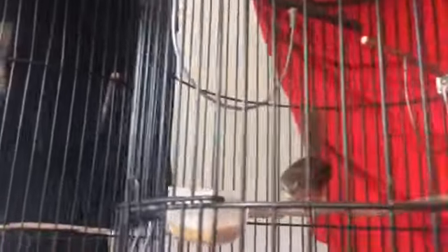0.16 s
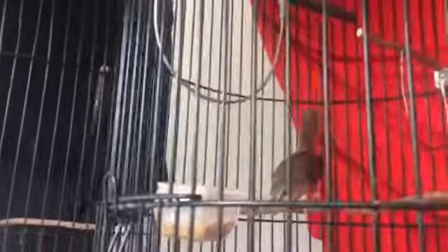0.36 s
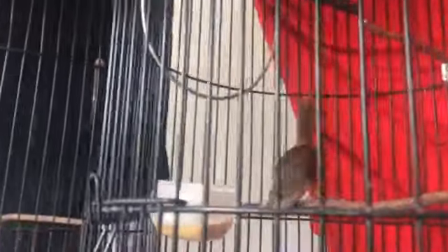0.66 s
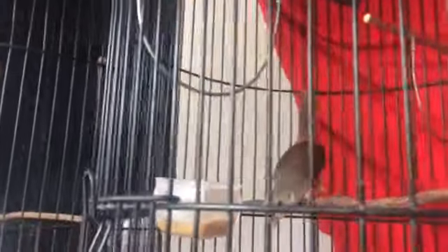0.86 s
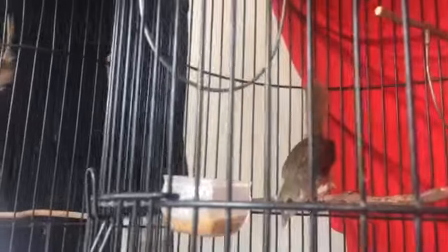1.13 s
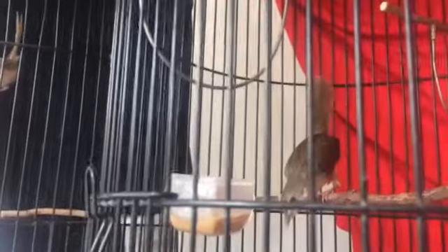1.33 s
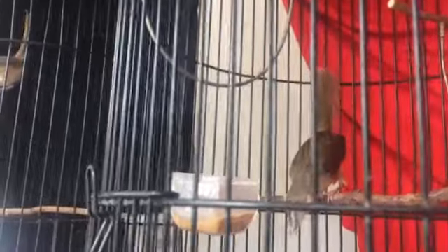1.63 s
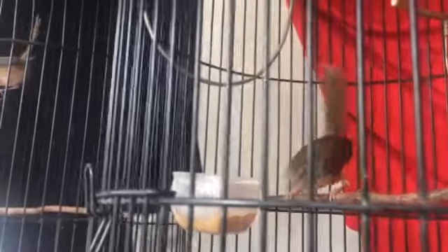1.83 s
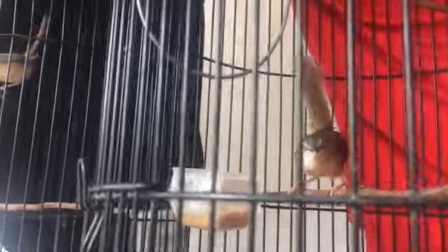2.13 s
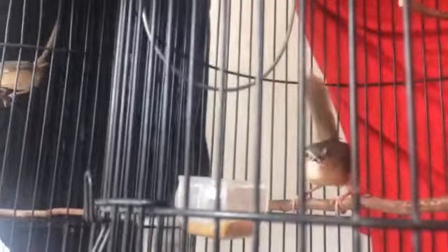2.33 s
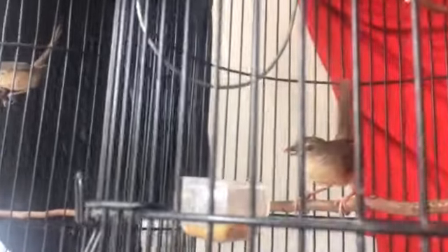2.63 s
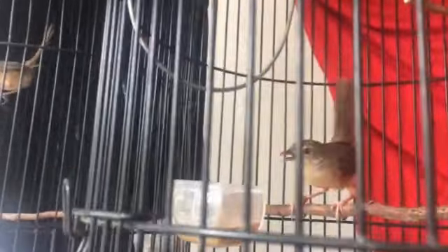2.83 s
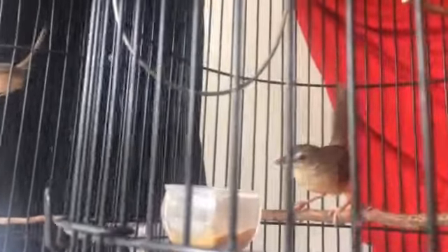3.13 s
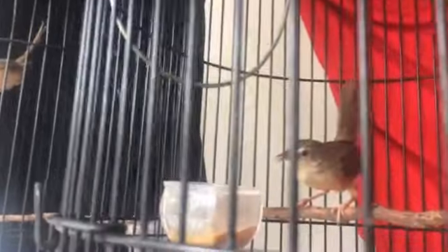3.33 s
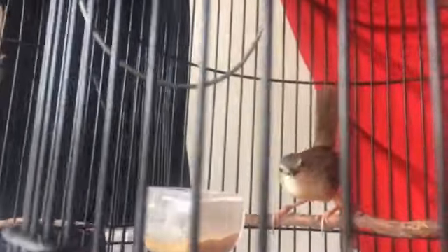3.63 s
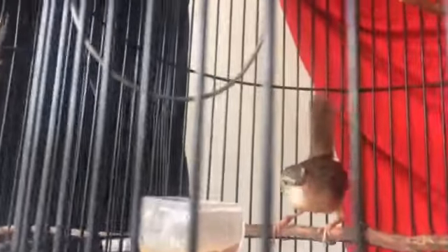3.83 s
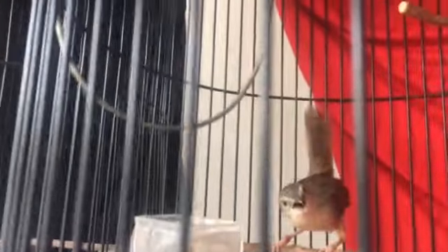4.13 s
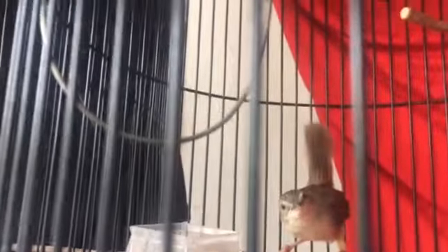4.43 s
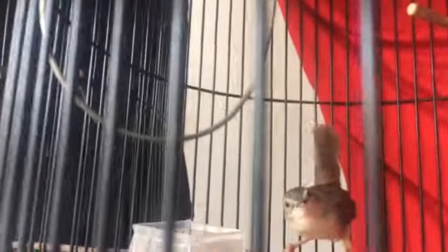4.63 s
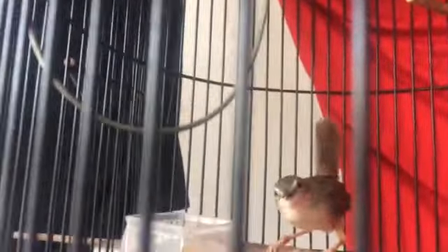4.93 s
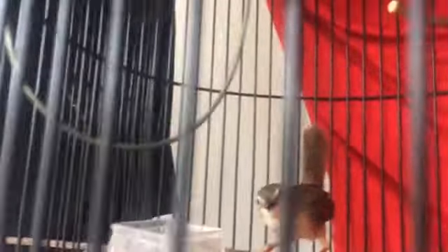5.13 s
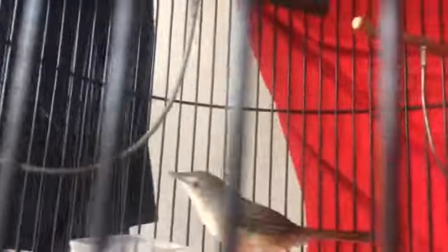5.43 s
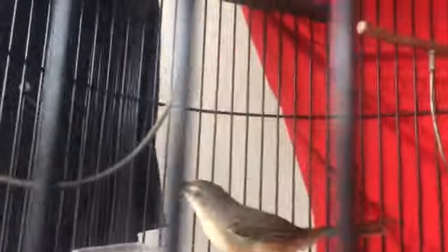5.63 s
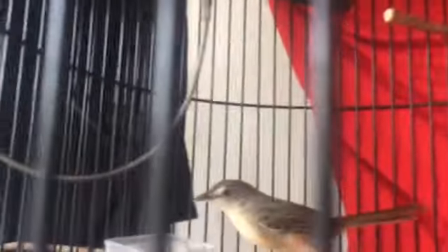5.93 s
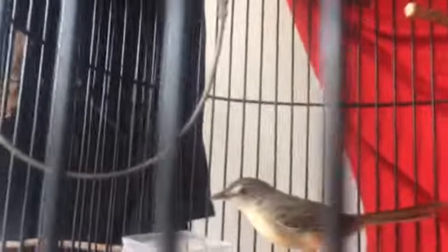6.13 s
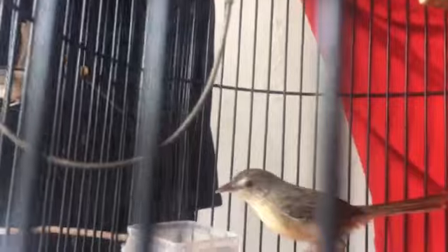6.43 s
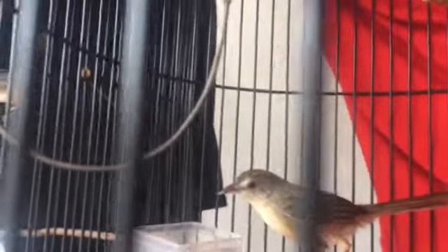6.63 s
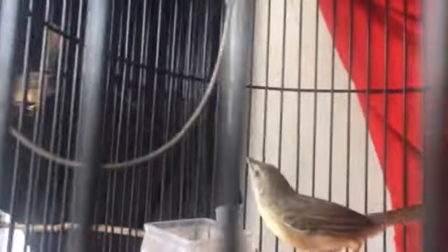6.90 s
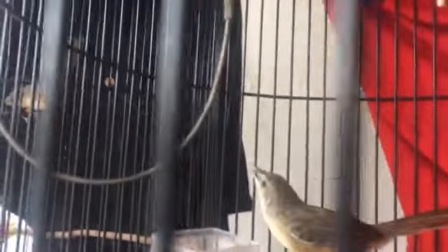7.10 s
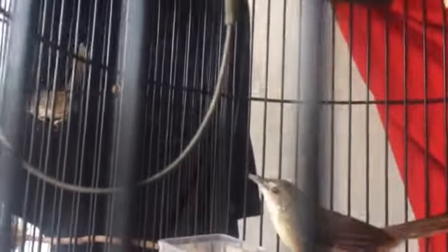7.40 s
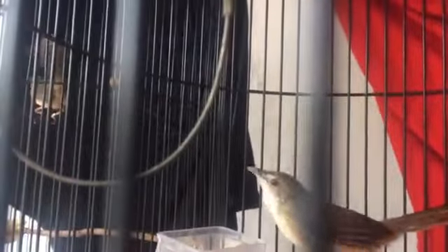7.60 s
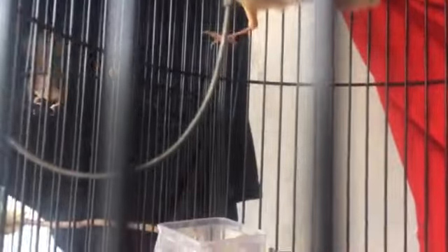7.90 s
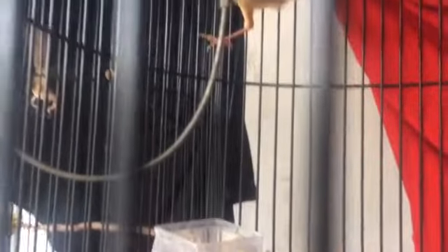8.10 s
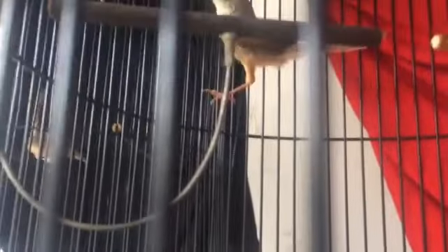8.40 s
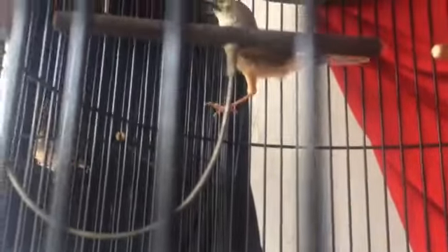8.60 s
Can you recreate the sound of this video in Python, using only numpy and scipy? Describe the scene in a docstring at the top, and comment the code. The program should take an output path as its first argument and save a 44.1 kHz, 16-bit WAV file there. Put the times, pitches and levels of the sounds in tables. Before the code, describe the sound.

Handheld close microphone indoors: a neighbouring caged songbird starts a regular ticking run of chirps, then the near bird joins with louder, thin whistled flicks, arches and rapid warbles, each under a tenth of a second or slightly longer. The neighbour pauses, then resumes steadily to the end. Faint hoarse and clear cockerel crows come from outside, with occasional dull bumps and a quiet hum. The near bird finishes with several piercing chips that briefly push the background down.

```python
"""A near caged warbler whistles loud zigzag sweeps indoors: a near-sine glides in pitch through a throat resonance.
A second warbler in the next cage repeats a down-up-down phrase by the same mechanism, with more room in it.
Far outside, cockerels crow as stacks of partials; a machine hums as wavering sines over shaped room noise.
Soft thuds are puffs of low noise, and a claw on the cage wire makes one decaying tick.
Gain control leans back when the song is loud."""
import sys
import numpy as np
from scipy import signal
from scipy.fft import rfft, irfft, next_fast_len
from scipy.io import wavfile
from scipy.ndimage import uniform_filter1d, minimum_filter1d, map_coordinates

SR = 44100
rng = np.random.default_rng(int(sys.argv[2]) if len(sys.argv) > 2 else 0)


def bounce(signal):
    """Save signal as a 16-bit WAV file at the path given by the first command-line argument."""
    frames = np.transpose(np.atleast_2d(signal))
    limited = np.clip(frames, -1, 1)
    pcm = np.round(limited * 32767).astype(np.int16)
    wavfile.write(sys.argv[1], SR, pcm)


N = 386316

# Throat resonance of both warblers: frequency_hz, gain_db
WARBLER_THROAT = [(2000, -24), (2600, -14), (3300, -4.5), (4800, 0), (5700, -4), (8000, -15)]
# Reverberation of the room: frequency_hz, t60_s
ROOM_DECAY = [(1000, 0.21), (5000, 0.22), (12000, 0.14)]
# Near bird's flicks, a faint quick rise and a loud fall:
# top_s, top_hz, halfway_hz, end_s, top_effort_db, fall_effort_db
FLICKS = [(-.004, 7160, 3450, .07, -2.5, -15.5), (1.779, 7300, 4300, 1.8, -13, -23.5),
          (2.085, 8150, 4500, 2.113, -11.5, -16), (2.737, 8240, 4400, 2.764, -11.5, -17.5),
          (2.814, 8240, 4400, 2.835, -8, -11), (3.317, 8000, 4100, 3.355, -6, -13.5),
          (4.26, 7700, 4500, 4.292, -5.5, -12), (7.582, 7640, 4000, 7.614, -19, -16.5),
          (8.221, 7640, 4000, 8.272, 8, -23), (8.344, 7760, 4150, 8.4, 6.5, -19)]
# Near bird's arches, a slow climb to a shoulder, a jump to the top and a fall:
# start_s, shoulder_s, shoulder_hz, top_s, top_hz, end_s, effort_db
ARCHES = [(1.815, 1.855, 4440, 1.863, 5800, 1.9, -15), (2.137, 2.17, 4450, 2.18, 5070, 2.206, -10.5),
          (3.381, 3.416, 4800, 3.423, 5290, 3.46, -11.5), (4.31, 4.342, 4400, 4.352, 5440, 4.387, -9.5),
          (4.654, 4.689, 3950, 4.702, 6690, 4.747, -10.5), (7.626, 7.669, 4760, 7.673, 6870, 7.708, -12)]
# Near bird's warbles: effort_db, first_top_db (about the effort), turning points (time_s, pitch_hz)
WARBLES = [ (-15.5, -9.5, [(2.42, 2183), (2.431, 4380), (2.447, 3120), (2.468, 5930), (2.503, 3095),
           (2.514, 4630), (2.532, 3750), (2.545, 2200)]), (-14.5, -7, [(2.965, 2170), (2.978, 7060),
           (2.994, 2380), (3.019, 5980), (3.046, 3690), (3.057, 6390), (3.095, 2220)]),
           (-11.5, -4, [(3.62, 2070), (3.635, 6290), (3.657, 2440), (3.679, 4280), (3.708, 3230),
           (3.717, 6860), (3.745, 2105)]), (-12.5, -5, [(3.915, 2240), (3.93, 6460), (3.948, 2690),
           (3.973, 5850), (4.003, 3300), (4.016, 4960), (4.045, 2140)]), (-10.5, -4, [(4.875, 2386),
           (4.886, 4040), (4.907, 3000), (4.926, 6320), (4.96, 3140), (4.972, 6580), (4.986, 4780),
           (5.013, 2583), (5.031, 5260), (5.045, 3900), (5.055, 2200)]), (-10, -5, [(5.237, 1907),
           (5.251, 6080), (5.268, 2450), (5.281, 2600), (5.296, 2300), (5.305, 3100), (5.336, 4830),
           (5.34, 6520), (5.358, 4200), (5.375, 1900)]), (-14.5, -24, [(7.21, 1980), (7.221, 5350),
           (7.242, 2705), (7.259, 3950), (7.272, 6760), (7.308, 2986), (7.32, 4010), (7.342, 3160),
           (7.35, 2000)]), (-18, -6, [(7.862, 2100), (7.877, 5780), (7.888, 3070), (7.904, 1790),
           (7.915, 2900), (7.946, 4510), (7.957, 6070), (7.975, 4000), (7.99, 1734)]), ]
# Near bird's caps, flicks that hold their top: top_s, top_hz, effort_db
CAPS = [(8.489, 7680, 5), (8.592, 7840, 5), (8.699, 7820, 4.5)]
# Spectrum of the room noise, relative: frequency_hz, density_db (per Hz)
AIR_SPECTRUM = [(15, -45), (25, -14.5), (87, 0), (161, 0), (405, -14.5), (911, -16.5), (1020, -18),
                (2280, -12), (2760, -11), (6920, -29), (16000, -41)]
# Lines of the machine hum: frequency_hz, level_db, width_hz (scales the depth and pace of the waver)
HUM_LINES = [(65, -46.5, 5), (143.4, -48, 3), (192.5, -51.5, 4.3), (345.4, -58.5, 18), (727, -60.5, 2.2),
             (930, -58, 6.5), (1440, -63, 3)]
# Neighbour's short warm-up arches that open a run:
# start_s, shoulder_s, shoulder_hz, top_s, top_hz, end_s, effort_db
WARMUPS = [(.277, .314, 4000, .346, 6100, .392, -27), (.5, .543, 4000, .556, 6690, .61, -25),
           (4.463, 4.503, 4300, 4.514, 6300, 4.568, -29)]
# Neighbour's phrase: time_s (from its start, at length factor 1), pitch_hz, effort_db (about the repeat)
PHRASE = [(0, 7740, 3), (.019, 2742, -4), (.035, 3540, -3.5), (.05, 3990, -3.5), (.064, 4580, -2.5),
          (.086, 6370, 2.5), (.093, 6520, 6.5), (.107, 6092, 6), (0.122, 4016, 0), (.146, 2343, 4.5)]
# Neighbour's repeats of the phrase: start_s, effort_db, length_factor
REPEATS = [(0.698, -25.5, 1.06), (0.943, -24, 1.05), (1.19, -20, 1.01), (1.424, -20.5, 0.98),
           (1.659, -20.5, 0.99), (1.889, -22, 0.98), (2.129, -23, 0.97), (2.367, -22.5, 0.96),
           (4.65, -27, 0.9), (4.859, -26, 1.04), (5.108, -25, 1.07), (5.349, -24.5, 0.98),
           (5.58, -21, 1.01), (5.817, -19.5, 0.97), (6.059, -20, 1.02), (6.297, -22, 0.96),
           (6.533, -21.5, 0.96), (6.768, -22, 0.91), (6.995, -21.5, 1.0), (7.228, -23.5, 1.07),
           (7.482, -22.5, 0.97), (7.715, -24, 0.94), (7.945, -22, 0.96), (8.176, -21, 0.98),
           (8.406, -21, 0.97), (8.649, -21, 1.02)]
# Soft thuds: peak_s, level_db
THUDS = [(1.205, -42), (1.745, -38), (4.294, -41.5), (4.649, -39), (4.958, -45.5), (5.449, -39.5),
         (6.767, -33), (7.375, -39.5)]
# Cockerels, one list per crow: time_s, pitch_hz (of the first partial), level_db, hoarseness (0-1)
CROWS = [
    [(5.58, 844, -73, .2), (5.65, 884, -44.5, 0.23), (5.78, 890, -65, 0.25), (5.88, 916, -55, 0.49),
     (6.05, 937, -58.5, 0.57), (6.22, 928, -51, 0.45), (6.5, 883, -60, 0.12), (6.68, 900.4, -42, 0.02),
     (6.9, 885, -48, 0.06), (7.02, 860, -56, 0.06), (7.17, 850, -64, 0.1)],
    [(5.84, 932, -66, 0.53), (5.93, 1024, -55, 0.35), (6.08, 1054, -50.5, 0.37), (6.2, 1041, -54, 0.49),
     (6.35, 953, -63, 0.42)],
    [(5.56, 768, -57, 0.75), (5.75, 780, -68, 0.81), (5.85, 769, -61, 0.8), (6.55, 782, -61.5, 0.76)],
]
# Cockerel's throat resonance: frequency_hz, gain_db
CROW_THROAT = [(800, -3.5), (1050, 8.5), (1500, 8), (2000, 16), (2600, -4)]
# A claw on the cage wire: start_s, level_db
WIRE_TICK = (8.121, -18.5)


def amp(db):
    """The decibel law: a level in dB becomes an amplitude ratio."""
    return 10 ** (np.asarray(db) / 20)


def unit(x):
    """Power normalisation: the signal is scaled to rms 1."""
    return x / np.sqrt(np.mean(x ** 2) + 1e-20)


def along(points, hz):
    """A frequency response: (Hz, value) points interpolated on a logarithmic axis."""
    f, value = np.transpose(points)
    return np.interp(np.log(hz + 1), np.log(f + 1), value)


def wobble(n, rate):
    """Band-limited fluctuation: a smooth curve of n samples through random knots, rate knots a second."""
    knots = rng.standard_normal(int(n * rate / SR) + 4)
    return map_coordinates(knots, [np.arange(n) * rate / SR])


def filtered(x, response):
    """Linear filtering: the spectrum of x is multiplied by a function of frequency."""
    m = next_fast_len(len(x) + 8192)
    spectrum = rfft(x, m) * response(np.fft.rfftfreq(m, 1 / SR))
    return irfft(spectrum, m)[:len(x)]


def add(track, s, sound):
    """Superposition: a sound is summed into the track from time s."""
    part = track[round(s * SR):][:len(sound)]
    part += sound[:len(part)]


def read(rows, round_s):
    """Continuous modulation: a gate for the ends, pitch gliding in even ratios, and the other columns."""
    s, hz, *cols = np.transpose(rows)
    t = np.arange(s[0], s[-1], 1 / SR)
    gate = np.clip(np.minimum(t - s[0], s[-1] - t) / round_s, 0, 1)
    width = max(int(round_s * SR), 1)
    log_hz, *rest = [uniform_filter1d(np.interp(t, s, c), width) for c in [np.log(hz), *cols]]
    return gate, [np.exp(log_hz), *rest]


def whistle(rows, overtones_db, half_db, breath_db):
    """Syrinx oscillation: a near-sine with weak overtones, shaped by throat resonance, over a hiss of air."""
    gate, (hz, effort_db) = read(rows, 0.0021)
    n = len(hz)
    t = np.arange(n) / SR
    phase = 2 * np.pi * np.cumsum(hz * (1 + 0.0045 * wobble(n, 292.4))) / SR
    throat_db = along(WARBLER_THROAT, hz)
    starts_low = hz[0] < hz.mean()
    # slack membranes buzz: rich overtones until they tighten
    slack_db = starts_low * 22 * np.exp(-t / 0.013)
    tone = np.sin(phase)
    for k, level_db in enumerate(overtones_db, 2):
        overtone_gain = amp(level_db + slack_db + 3 * wobble(n, 120))
        tone += overtone_gain * np.sin(k * phase) * (k * hz < SR / 2)
    tone *= amp(throat_db + 1.66 * wobble(n, 150.8))
    # a half-pitch leak at gentle starts, dying by 60 dB in 0.29 s
    gentle = starts_low and effort_db.max() < -3
    leak_gain = amp(half_db + along(WARBLER_THROAT, hz / 2) - 60 * t / 0.29)
    tone += gentle * leak_gain * np.sin(phase / 2)
    breath = amp(breath_db + throat_db / 2) * np.diff(rng.standard_normal(n + 1))
    return np.sqrt(2) * gate * amp(effort_db) * (tone + breath)


def room(x, early_db, tail_db):
    """Reflection: perch, cup and cage cover answer within 2 ms and notch some pitches, then the walls."""
    hz, t, z = signal.stft(rng.standard_normal(SR // 2), SR, nperseg=256)
    decay = amp(-60 * t / along(ROOM_DECAY, hz)[:, None])
    tail = signal.istft(z * decay, SR, nperseg=256)[1]
    answer = amp(tail_db) * np.pad(tail, (200, 0)) / np.linalg.norm(tail)
    # each call draws new early echoes: they shift as the bird turns its head
    answer[rng.integers(8, 70, size=3)] += amp(early_db) * rng.standard_normal(size=3)
    answer[0] = 1  # the direct sound
    answer /= np.linalg.norm(answer)
    return signal.fftconvolve(x, answer)


def rise(s, hz, db):
    """Rapid pitch rise: a faint quick climb to the top, loud only at the last moment."""
    return [(s - .014, 2400, -42),
            (s - .005, .62 * hz, -27),  # the bend where the climb steepens
            (s, hz, db)]


def flick(s, hz, half_hz, end_s, top_db, fall_db):
    """Downward sweep: up faintly, a quick drop off the top, a glide to halfway, a last glide that steepens."""
    half_s = (s + end_s) / 2
    end_hz = 2050
    late_hz = half_hz + .42 * (end_hz - half_hz)
    return rise(s, hz, top_db) + [
        (s + 0.15 * (end_s - s), 0.75 * hz, top_db - 4.5),
        (half_s, half_hz, fall_db),
        ((half_s + end_s) / 2, late_hz, fall_db),
        (end_s, end_hz, fall_db + 4)]  # a last push at the end


def arch(s, shoulder_s, shoulder_hz, top_s, top_hz, end_s, db, from_hz=2050, end_hz=1960):
    """Stepped pitch rise: a lift, the climb to a shoulder, the jump to the top, and a fall."""
    return [(s, from_hz, db),
            (s + 0.0082, 3080, db - 2.5),
            (shoulder_s, shoulder_hz, db),
            (top_s, top_hz, db - 0.5),
            ((top_s + end_s) / 2, 4180, db - 1.5),
            (end_s, end_hz, db + 3)]


def warble(db, first_db, turns):
    """Zigzag pitch modulation: a soft opening, then effort that grows along the turns."""
    effort_db = db + 2.5 * np.linspace(-.5, .5, len(turns))
    effort_db[0] += first_db - 8
    effort_db[1] += first_db
    effort_db[-1] -= 2
    return np.column_stack([turns, effort_db])


def cap(s, hz, db):
    """Sustained peak: up faintly, a sagging hold, and a fall that dies away."""
    hold_s, fall_s = .011, .021
    return rise(s, hz, db) + [
        (s + hold_s, .93 * hz, db - 7),
        (s + hold_s + fall_s / 2, 4800, db - 23),
        (s + hold_s + fall_s, 2500, db - 24)]


def near_bird():
    """Direct sound dominates close by: a fairly dry whistle, its first flick begun a moment early."""
    lead_s = 1  # room ahead of time zero for the early start
    track = np.zeros(N + lead_s * SR)
    for shape, table in (flick, FLICKS), (arch, ARCHES), (warble, WARBLES), (cap, CAPS):
        for row in table:
            rows = shape(*row)
            note = whistle(rows, overtones_db=(-29, -31, -35), half_db=-14, breath_db=-34)
            add(track, lead_s + rows[0][0], room(note, early_db=-5, tail_db=-11.5))
    return amp(3.0) * track[lead_s * SR:]


def room_air():
    """Broadband noise: random pressure with a shaped spectrum and a slowly drifting level."""
    noise = filtered(rng.standard_normal(N), lambda hz: amp(along(AIR_SPECTRUM, hz)))
    return amp(-45 + wobble(N, 3.1)) * unit(noise)


def machine_hum():
    """Line spectrum: sines that waver in pitch and strength, faster for wider lines."""
    t = np.arange(N) / SR
    hum = np.zeros(N)
    for hz, db, width_hz in HUM_LINES:
        gain = amp(db + 2.5 * wobble(N, 2.5 * width_hz))
        drift = np.cumsum(0.4046 * width_hz * wobble(N, width_hz)) / SR  # in cycles
        hum += gain * np.sin(2 * np.pi * (hz * t + drift))
    return hum


def neighbour():
    """Reflected sound dominates farther off: the same whistle with more of the room in it."""
    track = np.zeros(N)
    songs = [np.array(PHRASE) * [stretch, 1, 1] + [s, 0, db] for s, db, stretch in REPEATS]
    for row in WARMUPS:
        lead_in = (row[0] - .012, 5900, row[-1] - 12)  # a short soft drop leads into the arch
        songs.append([lead_in] + arch(*row, from_hz=2500, end_hz=2500))
    for rows in songs:
        note = whistle(rows, overtones_db=(-31,), half_db=-60, breath_db=-46)
        add(track, rows[0][0], room(note, early_db=0.5, tail_db=-1.0))
    return amp(-0.23) * track


def thuds():
    """Damped low-frequency impact: dull puffs of noise with a soft rise and fall."""
    def colour(hz):
        slope_db = -5 * np.log2(np.maximum(hz, 150) / 150)  # -5 dB per octave above 150 Hz
        return amp(slope_db) * (hz > 45) / (1 + (hz / 2600) ** 4)

    track = np.zeros(N)
    rise_s, fall_s = 0.068, 0.078
    for s, db in THUDS:
        t = np.arange(-0.2, 0.3, 1 / SR)
        puff = unit(filtered(rng.standard_normal(len(t)), colour))
        swell = np.exp(-(t / np.where(t < 0, rise_s, fall_s)) ** 2)
        add(track, s + t[0], amp(db) * swell * puff)
    return track


def cockerels():
    """Harmonic voicing: partials whose pitch and strength shake when hoarse, through throat and distance."""
    track = np.zeros(N)
    for rows in CROWS:
        gate, (hz, db, hoarse) = read(rows, 0.019)
        shake = .085 * hoarse ** 1.5 * wobble(len(hz), 70)
        phase = 2 * np.pi * np.cumsum(hz * (1 + shake)) / SR
        stack = sum(amp(along(CROW_THROAT, k * hz)) * np.sin(k * phase) for k in (2, 3))
        # a clear crow is nearly all second partial; hoarseness brings in the first
        stack += 3.6 * hoarse * amp(along(CROW_THROAT, hz)) * np.sin(phase)
        crow = gate * amp(db + 8.6 * hoarse * wobble(len(hz), 39.53)) * stack
        add(track, rows[0][0], room(crow, early_db=-15, tail_db=-7))
    return track


def wire_tick():
    """Damped resonance: a claw rings the cage wire at 2300 Hz, dying by 60 dB in 4.8 ms."""
    track = np.zeros(N)
    start_s, level_db = WIRE_TICK
    t = np.arange(SR // 50) / SR
    ring = amp(level_db - 60 * t / 0.0048) * np.sin(2 * np.pi * 2300 * t)
    add(track, start_s, room(ring, early_db=-4, tail_db=-26))
    return track


def scene():
    """Superposition of every source in one channel."""
    birds = near_bird() + neighbour() + cockerels()
    surroundings = room_air() + machine_hum() + thuds() + wire_tick()
    return (birds + surroundings)[None]


def record(dry):
    """Dynamic compression: gain follows recent loudness, a limiter holds peaks, then a band limit."""
    memory_s, threshold_db, slope, ceiling, top_hz = .35, -26.0, .35, .92, 16100
    keep = np.exp(-1 / (memory_s * SR))
    power = signal.lfilter([1 - keep], [1, -keep], dry[0] ** 2)
    loud_db = 10 * np.log10(power + 1e-9)
    level = dry[0] * amp(-slope * np.maximum(loud_db - threshold_db, 0))
    needed = np.minimum(1, ceiling / (np.abs(level) + 1e-9))
    # the lowest gain within a 10 ms window, smoothed over 5 ms
    level *= uniform_filter1d(minimum_filter1d(needed, size=441), size=221)
    return filtered(level, lambda hz: hz < top_hz)[None]


dry = scene()
out = record(dry)
bounce(out)
```